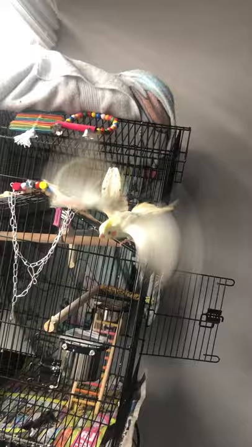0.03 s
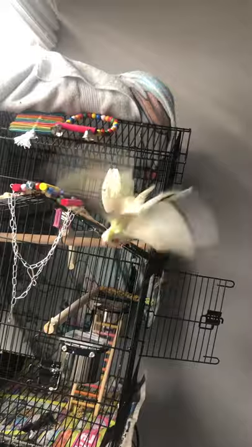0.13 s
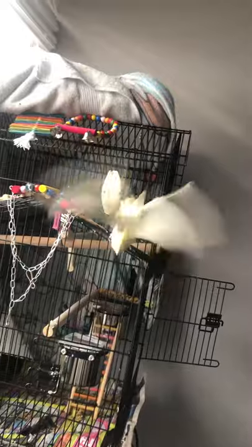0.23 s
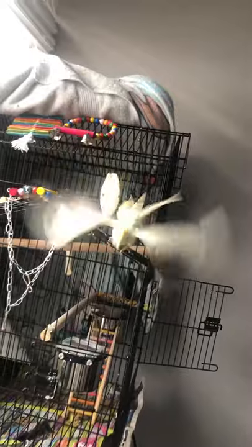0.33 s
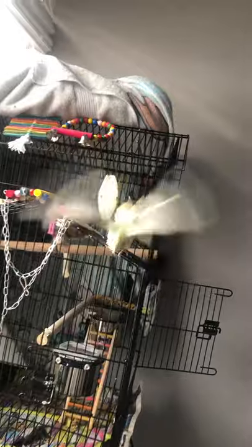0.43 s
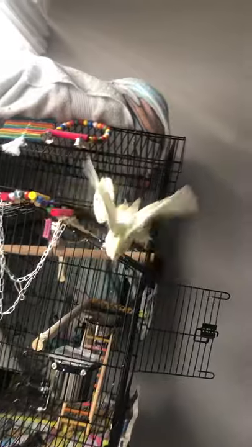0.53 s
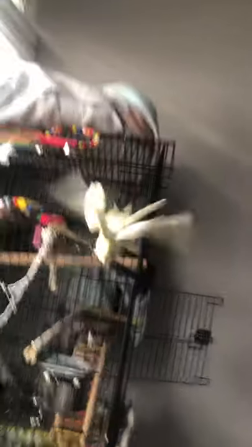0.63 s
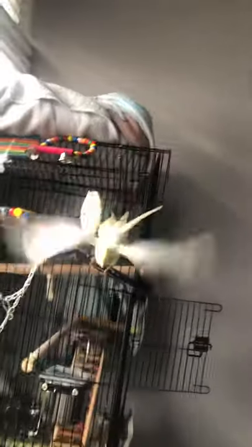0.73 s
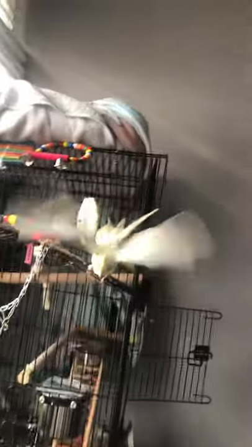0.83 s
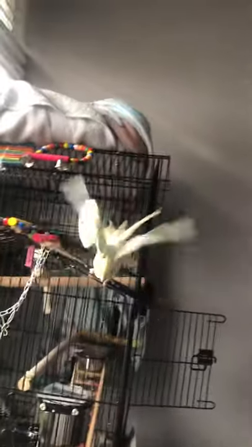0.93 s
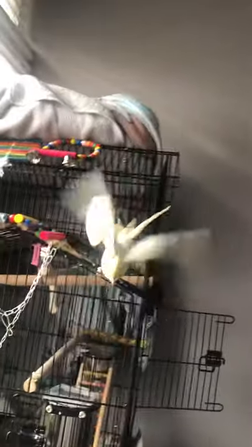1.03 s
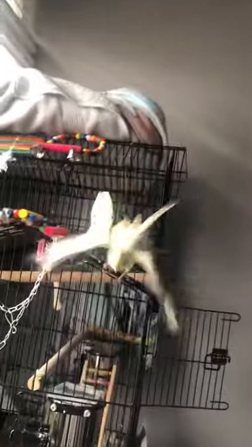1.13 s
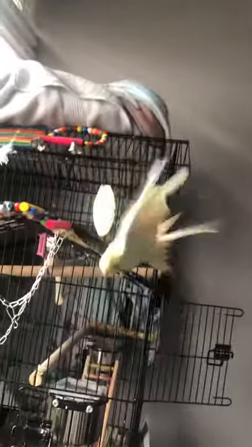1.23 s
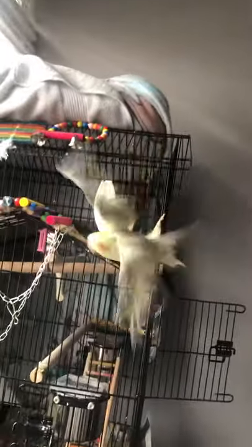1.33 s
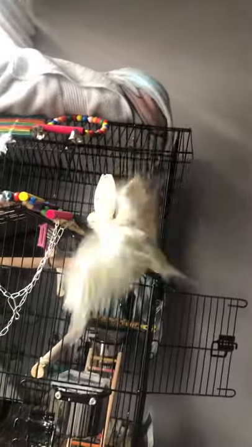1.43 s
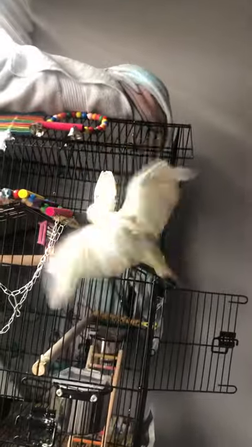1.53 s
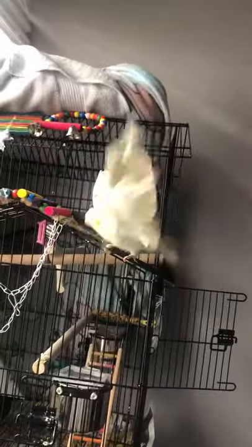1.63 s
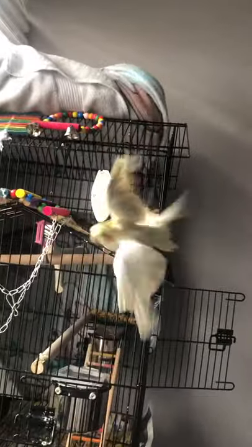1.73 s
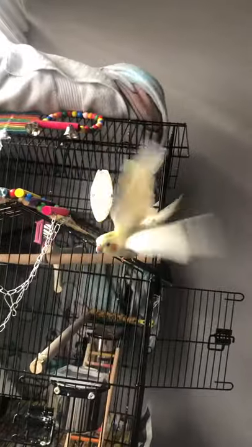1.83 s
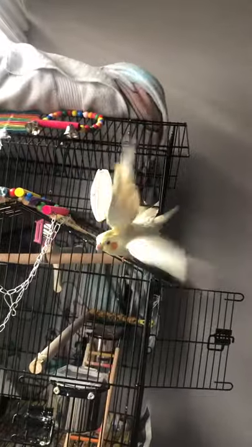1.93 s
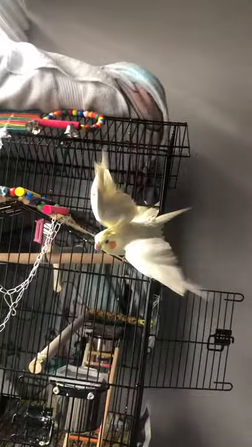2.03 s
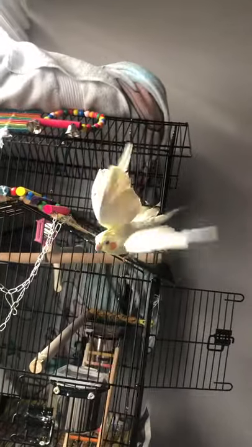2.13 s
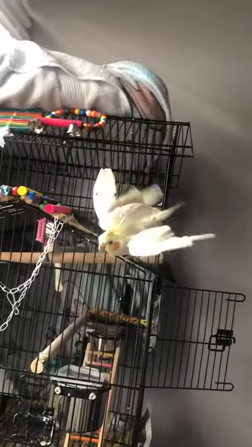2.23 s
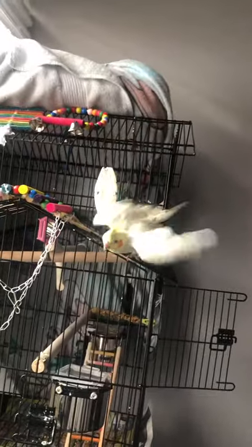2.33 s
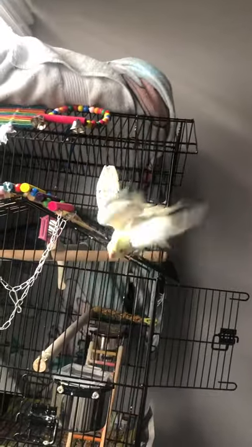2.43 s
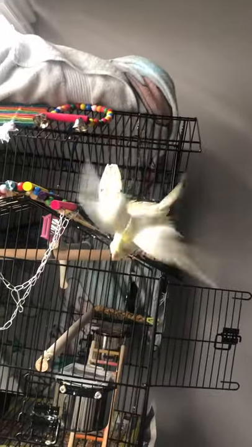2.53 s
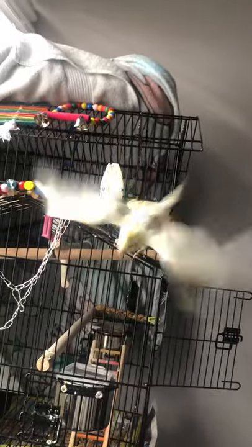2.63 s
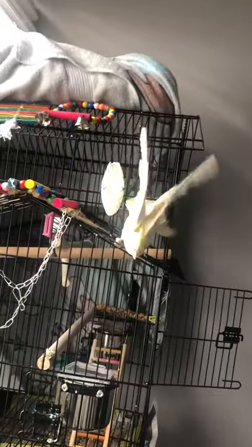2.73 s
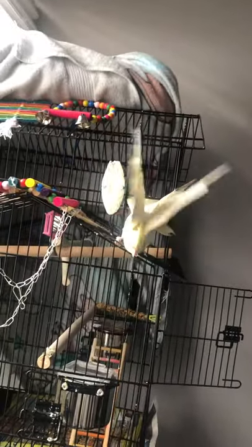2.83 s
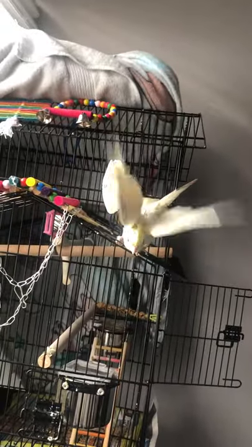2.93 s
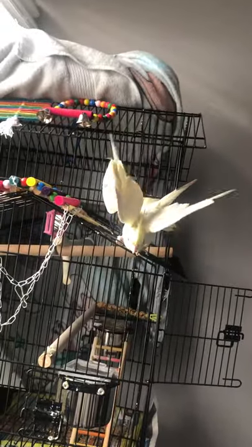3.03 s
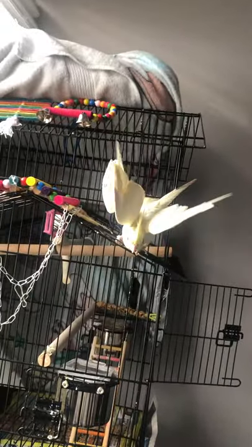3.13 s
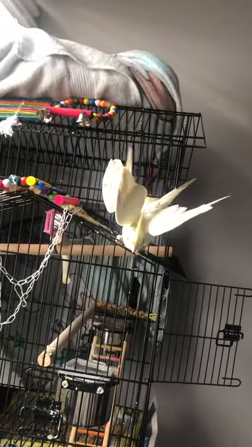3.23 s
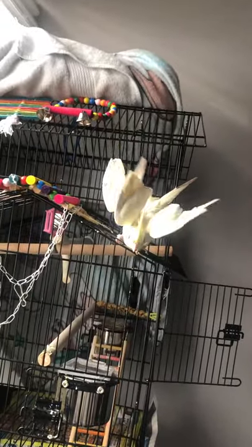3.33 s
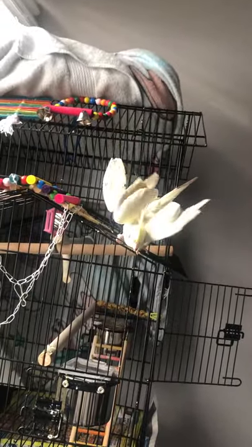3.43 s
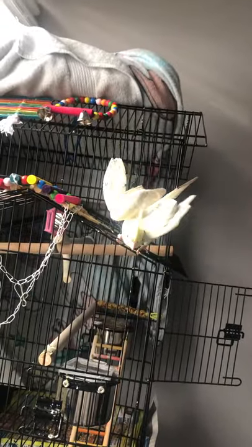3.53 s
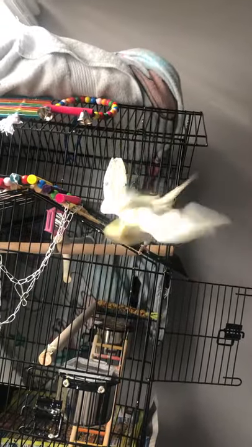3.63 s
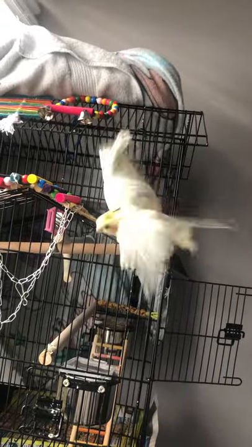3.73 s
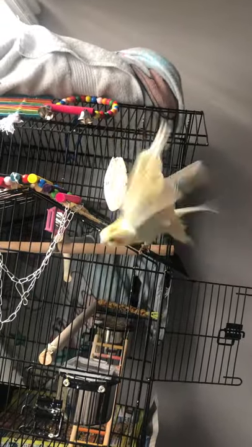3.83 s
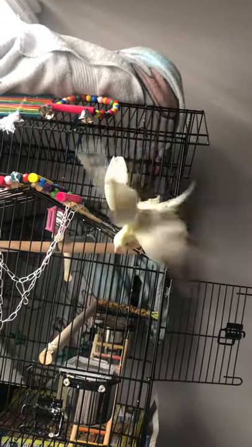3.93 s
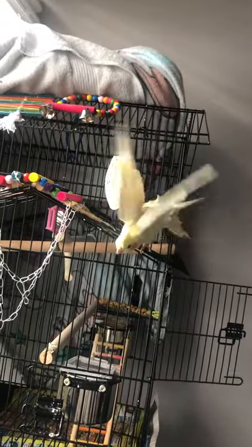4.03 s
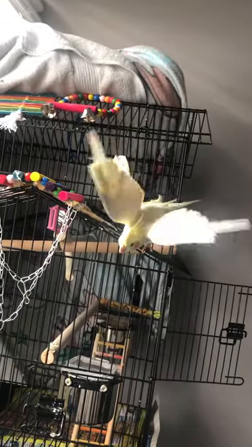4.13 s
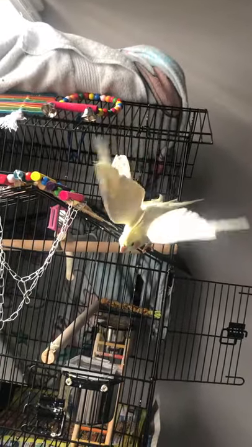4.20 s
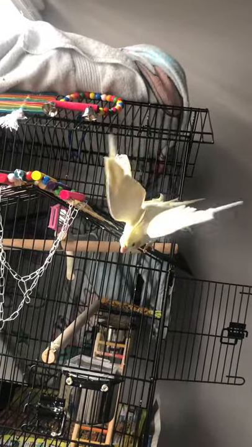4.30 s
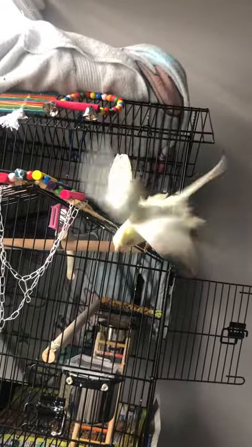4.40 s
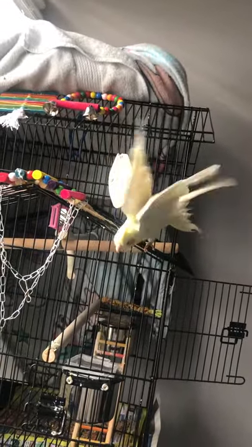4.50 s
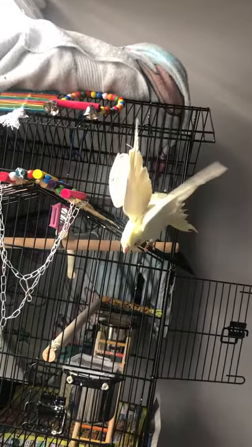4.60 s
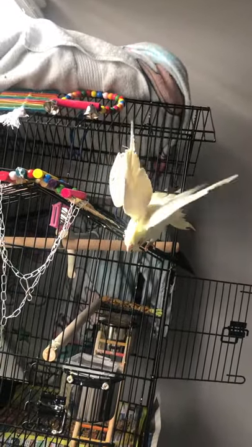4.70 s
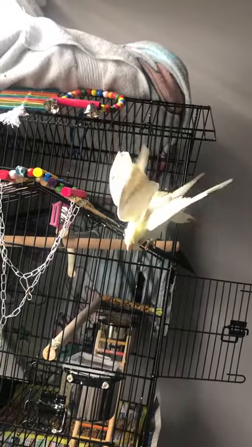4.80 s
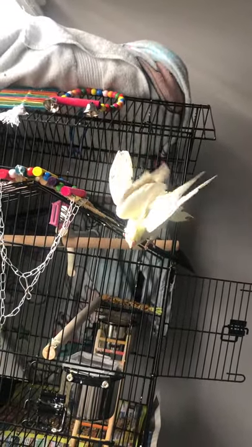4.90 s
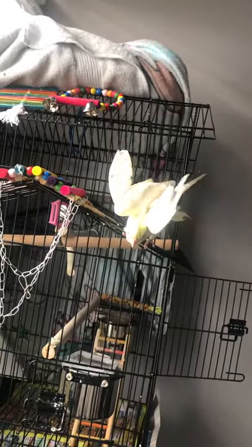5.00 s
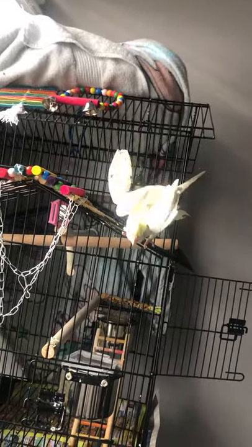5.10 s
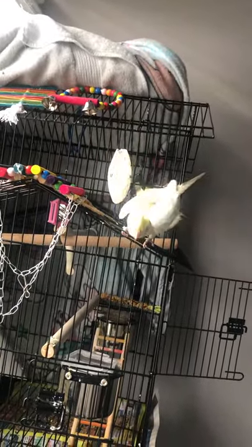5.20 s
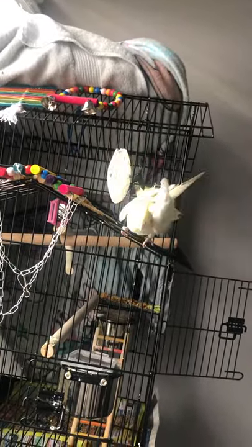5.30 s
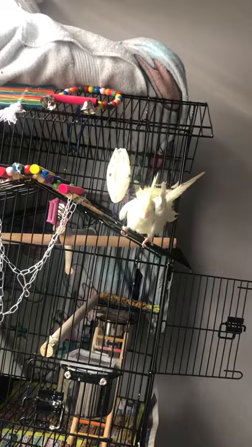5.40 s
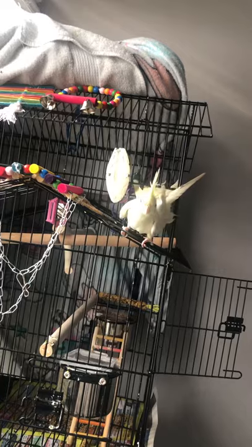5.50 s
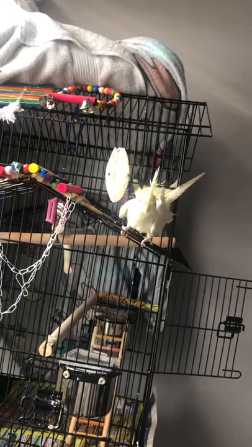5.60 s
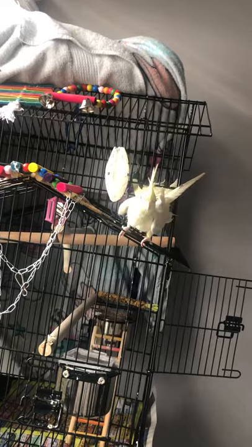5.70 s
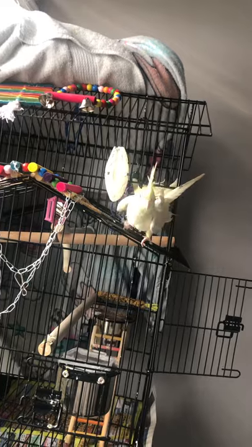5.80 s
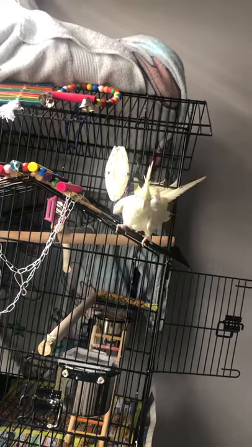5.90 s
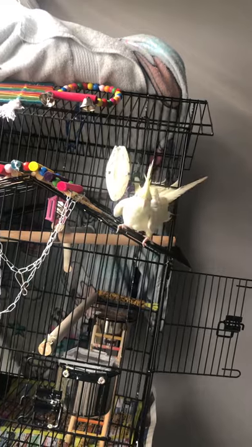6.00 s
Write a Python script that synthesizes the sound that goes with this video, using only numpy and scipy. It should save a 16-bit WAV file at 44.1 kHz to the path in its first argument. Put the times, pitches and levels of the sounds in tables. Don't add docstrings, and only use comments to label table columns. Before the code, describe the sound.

A small parrot beats its wings against its wire cage, feathers snapping sharply on the bars while a loose door clatters and rings in a quiet room.

```python
import sys
import numpy as np
from scipy import signal
from scipy.fft import rfft, irfft
from scipy.io import wavfile
from scipy.ndimage import uniform_filter1d, map_coordinates

SR = 44100
rng = np.random.default_rng(int(sys.argv[2]) if len(sys.argv) > 2 else 0)


def master(y):
    cut = np.clip(np.atleast_2d(y).T, -1, 1)
    pcm = np.round(cut * 32767)
    wavfile.write(sys.argv[1], SR, pcm.astype(np.int16))


def volts(x):
    e = np.asarray(x, float) / 20
    return 10 ** e


N = 266849
PATHS = 7
WALL_DELAY_S = 0.003


def unit(x):
    return x / np.sqrt(np.mean(x ** 2) + 1e-20)


def along(points, hz):
    point_hz, value = np.transpose(points)
    return np.interp(np.log(hz + 1), np.log(point_hz + 1), value)


def wobble(rate_hz):
    knots = rng.standard_normal(int(N * rate_hz / SR) + 4)
    return map_coordinates(knots, [np.arange(N) * rate_hz / SR])


def noise(spectrum):
    hz = np.fft.rfftfreq(N, 1 / SR)
    return unit(irfft(rfft(rng.standard_normal(N)) * volts(along(spectrum, hz)), N))


def band(x, hz, width):
    edges_hz = np.clip([hz * (1 - width / 2), hz * (1 + width / 2)], 50, .45 * SR)
    return signal.lfilter(*signal.butter(1, edges_hz, "bandpass", fs=SR), x)


def add(track, start_s, piece):
    part = track[round(start_s * SR):][:len(piece)]
    part += piece[:len(part)]


def feather(blow, level_db, pitch_hz, body_db):
    bright = band(blow, pitch_hz, width=0.12) + volts(-5.5) * band(blow, 7840, width=1.05)
    body = band(blow, 2330, width=1.56)
    return volts(level_db) * (bright + volts(body_db + 12.0) * body)


# start_s, first_peak_db, pitch_hz, body_db, tail_db
RAKES = [(0.171, -20.5, 7400, -25, -14.5), (0.1802, -24, 12100, -22, -17), (0.28, -29.5, 6030, -6.5, -11),
         (0.2965, -16.5, 7350, -15, -17), (0.5227, -37.5, 4900, -12, -19), (1.0617, -24, 9700, -5, -13),
         (1.0646, -17.5, 12500, -8.5, -11), (1.0668, -36, 1060, -32, -11),
         (1.3211, -33.5, 8600, -2.5, -12.5), (1.3241, -31, 6550, -12, -9), (1.44, -39, 5000, -4, -6),
         (1.5196, -15, 9100, -8, -18.5), (1.5387, -20, 6400, -19, -15), (2.338, -34.5, 3870, -7, -14.5),
         (2.5357, -20, 9150, -8, -15.5), (2.543, -18.5, 6700, -14.5, -11.5), (2.5674, -18, 6900, -14, -20),
         (3.6201, -22, 5600, -10.5, -14.5), (3.6612, -24, 7550, -6.5, -14), (3.806, -37, 4800, -0.5, -14.5),
         (4.2957, -13, 7850, -18, -9.5), (4.307, -12, 8050, -23.5, -11.5)]
# start_s, peak_db, pitch_hz, tail_db
FEATHER_TIPS = [(0.0407, -39, 5300, -17), (0.063, -30.5, 11600, -25), (0.0705, -35, 6850, -7.5),
                (0.1691, -32, 9800, -18), (0.2681, -34, 12000, -8), (0.2826, -27, 3470, -20),
                (0.4966, -48, 11500, -6), (0.53, -33, 4700, -17), (0.7575, -40, 4700, -6),
                (0.777, -27.5, 4500, -12), (1.063, -21, 12300, -9), (1.1787, -44, 3800, -15),
                (1.2613, -48, 4000, -12.5), (1.3289, -34.5, 3480, -3), (1.4916, -36, 6370, -12),
                (2.3446, -43, 5500, -1.5), (2.5215, -43.5, 6600, -17), (2.5415, -41, 9700, -17),
                (3.592, -45, 2720, 0), (3.63, -39, 2560, 1), (3.740, -45, 11000, -6),
                (3.7742, -44, 7000, -8), (3.787, -39.5, 9950, -8), (5.736, -56.5, 12600, 6),
                (5.867, -53, 6000, -10), (5.616, -57, 2500, -14)]
TIP_BODY_DB = -15.5
QUILLS, QUILL_GAP_S, QUILL_LOSS_DB = 3, .002, 8.5
QUILL_SCATTER = .15


def quills():
    chance = rng.standard_normal((len(RAKES), QUILLS, 2))
    contacts = []
    for (start_s, peak_db, pitch_hz, body_db, tail_db), row in zip(RAKES, chance):
        for k, (late, detune) in enumerate(row):
            quill_s = start_s + k * QUILL_GAP_S * (1 + .15 * late)
            quill_hz = pitch_hz * (1 + QUILL_SCATTER * detune * (k > 0))
            contacts.append((quill_s, peak_db - k * QUILL_LOSS_DB, quill_hz, body_db + 3 * k, tail_db + 2.3 * k))
    for start_s, peak_db, pitch_hz, tail_db in FEATHER_TIPS:
        contacts.append((start_s, peak_db, pitch_hz, TIP_BODY_DB, tail_db))
    return contacts


def snaps():
    near, far = np.zeros(N), np.zeros((PATHS, N))
    t = np.arange(SR // 20) / SR
    for k, (start_s, peak_db, pitch_hz, body_db, tail_db) in enumerate(quills()):
        white, later, sizes = rng.standard_normal((3, len(t)))
        crack = white * volts(-60 * t / 0.00052)
        crack /= abs(feather(crack, 0, pitch_hz, body_db - 10)).max()
        spikes = volts(14 * uniform_filter1d(sizes, size=9)) * (1 - np.exp(-t / 0.00021))
        tail = later * spikes * volts(-60 * t / 0.054)
        scatter = feather(tail, peak_db + tail_db - 5.5, pitch_hz, body_db)
        add(near, start_s - .0002, feather(crack, peak_db + 1, pitch_hz, body_db - 4) + scatter)
        add(far[k % PATHS], start_s + WALL_DELAY_S, scatter)
    return near + volts(-4.0) * room(far)


# start_s, peak_db, pitch_hz, body_db, length_s
BAR_BRUSHES = [(0.0623, -26.5, 12500, -13, 0.023), (0.1824, -21.5, 5660, -14.5, 0.014),
               (0.2683, -37, 5450, -12, 0.012), (0.398, -38, 4130, -11, 0.015),
               (0.5147, -32, 4800, -9.5, 0.016), (0.5168, -47, 4740, -9, 0.0099),
               (0.631, -44, 8520, -5, 0.044), (0.7577, -27, 4800, -18, 0.024),
               (1.205, -24, 4140, -26, 0.025), (1.264, -43, 8150, 0, 0.022),
               (1.4331, -37, 4100, -14, 0.025), (1.75, -54, 4200, 6, 0.018), (1.859, -54.5, 4470, 3, 0.014),
               (2.2645, -47.5, 6860, -3.5, 0.018), (2.397, -42, 7850, -27, 0.054),
               (3.298, -53, 9100, -13, 0.034), (3.5513, -40.5, 4260, -20, 0.14),
               (3.948, -53, 4260, -7, 0.022), (4.811, -54, 5680, -26, 0.035),
               (1.038, -41.5, 11000, -14, 0.033),
    (2.504, -43, 8400, -11, 0.042),
    (4.265, -48.5, 7000, -15, 0.096),
]


def brushes():
    near, far = np.zeros(N), np.zeros((PATHS, N))
    t = np.arange(SR // 5) / SR
    for k, (start_s, peak_db, pitch_hz, body_db, length_s) in enumerate(BAR_BRUSHES):
        white, sizes = rng.standard_normal((2, len(t)))
        swell = (1 - np.exp(-t / 0.0048)) * np.exp(-(t / np.clip(length_s, .004, .09)) ** 2)
        ticks = white * volts(3.6 * uniform_filter1d(sizes, size=9)) * swell
        brush = feather(ticks, peak_db - 15.5, pitch_hz, body_db + 0.5)
        add(near, start_s - .0015, brush)
        add(far[k % PATHS], start_s + WALL_DELAY_S, brush)
    return near + volts(-5.5) * room(far)


def rings(modes, t, spread, blur):
    hz, level_db, t60_s = np.transpose(modes)[:, :, None]
    size, shift, phase = rng.standard_normal((3, len(modes), 1))
    wander = blur * np.cumsum(rng.standard_normal((len(modes), len(t))), axis=1)
    decay = volts(level_db + 0.78 * size - 60 * t / t60_s)
    return decay * np.sin(2 * np.pi * (hz * (1 + spread * shift) * t + phase + wander))


def reach(modes, low_db, high_db):
    hz = np.array(modes)[:, :1]
    return volts(np.where(hz < 1000, low_db, np.where(hz > 2500, high_db, 0)))


# start_s, peak_db, low_modes_db, high_modes_db
DOOR_KNOCKS = [(0.0363, -44, -14, -11.5), (0.0897, -42, -17, -9), (0.1384, -43.5, -11.5, -4.5),
               (0.191, -45, -9.5, -6), (0.2404, -44, -9.5, -5), (0.3521, -44.5, -17, -1.5),
               (0.4084, -46, -13, -7), (0.4684, -45.5, -12, -2), (0.5914, -46, -14, -5),
               (0.7154, -46.5, -11.5, -5.5), (0.8385, -48, -8.5, -5), (1.1984, -45.5, -12, -6.5),
               (1.2945, -45.5, -9.5, -2.5), (1.3553, -45, -12, -5.5), (1.4097, -45, -10, -3),
               (1.4544, -44.5, -0.5, 2), (1.5744, -49.5, -4, -2), (1.6681, -48, -7, -3),
               (1.7294, -47.5, -15, -3.5), (1.7994, -58, -3, -7.5), (2.5681, -48, -5.5, 3.5),
               (2.6135, -48, -9.5, 0.5), (2.6768, -54.5, -5.5, -5.5), (2.7594, -66.5, 0, -14),
               (3.6995, -48, -5.5, -1), (3.8008, -50.5, -8, -0.5), (3.8651, -59, -15, -8),
               (4.3794, -48.5, -13, -7), (4.4344, -50, -12, -0.5), (4.4962, -57, -9, -18),
               (0.9892, -57, -9, -6),
    (2.9094, -68, 1.5, -18),
    (3.9135, -66, 2, -16),
    (4.6493, -70, -16, -12),
]
# pitch_hz, level_db, t60_s
WIRE_MODES = [(478, -1.5, 0.87), (676, -5.5, 1.07), (781, 0, 1.67), (1665, -6.5, 1.5), (1879, 5, 0.35),
              (1925, -17, 0.18)]
# pitch_hz, level_db, t60_s
DOOR_MODES = [(682, -5.5, 0.12), (730, -7.5, 0.074), (1342, -7.5, 0.11), (1907, -3.5, 0.12),
              (2060, -2, 0.048), (2053, -13, 0.073), (3066, -6, 0.049), (3223, -6, 0.054),
              (3222, -3.5, 0.041), (4140, -3, 0.064), (4200, -10.5, 0.049), (4624, -7, 0.049),
              (5470, -8, 0.029), (6260, -8, 0.05)]


def cage():
    near, far = np.zeros(N), np.zeros((PATHS, N))
    t = np.arange(SR * 2 // 3) / SR
    door_t = t[:SR // 8]
    wire_swell = (1 - np.exp(-t / 0.0055)) * np.cos(np.pi / 2 * t / t[-1])
    for k, (start_s, peak_db, low_db, high_db) in enumerate(DOOR_KNOCKS):
        chatter = rng.standard_normal(2000) ** 3 * volts(-25.5 - 60 * t[:2000] / .05)
        chatter[0] = 4
        panel = reach(DOOR_MODES, low_db / 2 + 5.5, high_db + 6.0) * rings(DOOR_MODES, door_t, .006, .016)
        panel = panel.sum(0) * (1 - np.exp(-door_t / 0.00093))
        door = signal.fftconvolve(panel, chatter / np.linalg.norm(chatter))
        wires = reach(WIRE_MODES, low_db + 6.0, high_db + 4.0) * rings(WIRE_MODES, t, .0006, .004)
        add(near, start_s - .001, volts(peak_db - 3.0) * door)
        add(far[k % PATHS], start_s + WALL_DELAY_S, volts(peak_db - 7) * door)
        add(near, start_s, volts(peak_db - 15.5) * wires.sum(0) * wire_swell)
    return near + room(far)


# pitch_hz, width_hz, level_db
BAR_MODES = [(680, 250, 4.5), (1680, 730, 0), (3670, 450, 3), (4170, 500, 1), (6700, 650, -3),
             (8250, 380, -7), (9700, 130, -24), (11100, 160, 0), (13500, 250, -9)]
SLIDE_S, SLIDE_HOLD_S, SLIDE_DB = 5.692, 0.078, -61.5
GRIP_DB_PER_S, PRESS_DB_PER_S, SLIP_DB_PER_S = 1100, 35, 152


def claw():
    f = np.fft.rfftfreq(N, 1 / SR)
    bar = volts(-24)
    for pitch_hz, width_hz, level_db in BAR_MODES:
        mode = 1j * f / (pitch_hz * pitch_hz - f * f + 1j * f * width_hz) * width_hz
        bar = bar + volts(level_db) * mode
    grains = rng.standard_normal(N) * volts(2.5 * wobble(400) + 1.2 * wobble(60))
    t = np.arange(N) / SR - SLIDE_S
    press_db = PRESS_DB_PER_S * np.minimum(t - SLIDE_HOLD_S, 0)
    edge_db = np.minimum(GRIP_DB_PER_S * t, SLIP_DB_PER_S * (SLIDE_HOLD_S - t))
    slide_db = SLIDE_DB + press_db + np.minimum(0, edge_db)
    return volts(slide_db) * unit(irfft(rfft(grains) * bar, N))


# freq_hz, density_db
SWISH_SPECTRUM = [(290, -46), (500, 0.5), (1180, -18), (1740, -7.5), (1930, -11.5), (2160, -8), (7860, -10),
                  (9490, -12), (16000, -13)]
# freq_hz, density_db
PUSH_SPECTRUM = [(30, -5), (65, -5.5), (130, 2), (220, -6), (450, -10), (900, -42)]
# time_s, effort_db
WING_EFFORT = [(0.03, -59), (0.35, -58.5), (0.7, -65.5), (1.0, -66.5), (1.2, -61.5), (1.5, -55.5),
               (1.85, -69), (1.95, -77), (2.3, -73.5), (2.65, -66), (2.85, -81.5), (3.5, -81), (3.58, -61),
               (3.9, -71.5), (4.15, -80), (4.6, -86), (4.8, -74.5), (5.3, -86)]
# peak_s, swish_db, push_db, length_s
WING_STROKES = [(0.08, -62, -59, 0.031), (0.19, -68, -57, 0.043), (0.296, -46, -51, .025),
                (0.535, -77, -58, 0.07), (0.78, -76, -57.5, 0.018), (1.075, -55, -47, 0.025),
                (1.23, -53, -76, 0.066), (1.276, -50, -56, 0.038), (1.356, -72, -48.5, 0.039),
                (1.52, -71, -41.5, 0.026), (2.155, -68, -60, 0.026), (2.323, -63.5, -65, 0.058),
                (2.548, -72, -48, 0.023), (2.627, -68, -81, 0.023), (3.633, -42, -45.5, 0.022),
                (3.67, -64, -48.5, 0.016), (3.804, -57, -52, 0.039), (4.32, -86, -58, 0.1),
                (4.687, -68, -70, .03), (4.868, -75, -72, 0.14), (5.82, -81, -57.5, 0.062)]
STIR_DB = -10
RECOVERY = 2.2


def wings():
    now = np.arange(N) / SR
    swish = unit(noise(SWISH_SPECTRUM) * volts(1.73 * wobble(60) + 1.1 * wobble(900)))
    push = unit(noise(PUSH_SPECTRUM) * volts(1.46 * wobble(25.12)))
    rub = volts(np.interp(now, *np.transpose(WING_EFFORT)) + 0.5 * wobble(13))
    air = volts(STIR_DB) * rub
    for peak_s, swish_db, push_db, length_s in WING_STROKES:
        fade_s = np.where(now < peak_s, length_s / 2, length_s / 2 * RECOVERY)
        swell = np.exp(-abs(now - peak_s) / fade_s)
        rub = rub + volts(swish_db - 5.0) * swell
        air = air + volts(push_db - 4.5) * swell
    return swish * rub + push * air


# freq_hz, t60_s
WALL_DECAY = [(200, 0.58), (800, 0.48), (2000, 0.47), (6000, 0.32), (15000, 0.19)]


def room(paths):
    hz, t, z = signal.stft(rng.standard_normal((PATHS, SR // 2)), SR, nperseg=256)
    decay = volts(-60 * t / along(WALL_DECAY, hz)[:, None])
    tail = signal.istft(z * decay, SR, nperseg=256)[1]
    tail *= 1 - np.exp(-np.arange(tail.shape[1]) / SR / 0.0077)
    tail /= np.linalg.norm(tail, axis=1, keepdims=True)
    return signal.fftconvolve(paths, tail, axes=1).sum(0)[:N]


# freq_hz, density_db
QUIET_SPECTRUM = [(15, -49), (25, -8.5), (55, -7.5), (172, -6), (202, -0.5), (232, -12), (304, -4.5),
                  (399, -13), (483, -14), (1430, -24), (1680, -26), (2900, -28), (12600, -30.5),
                  (15200, -36.5), (16500, -46)]
# pitch_hz, rms_db
HUM_TONES = [(60, -76.5), (200, -97)]
QUIET_DB = -66


def room_tone():
    now = np.arange(N) / SR
    hum = np.zeros(N)
    for pitch_hz, rms_db in HUM_TONES:
        hum += volts(rms_db + 3 + 2.7 * wobble(8.5)) * np.sin(2 * np.pi * pitch_hz * now)
    return volts(QUIET_DB - 1.23 + 0.46 * wobble(2.8)) * noise(QUIET_SPECTRUM) + hum


def scene():
    return (snaps() + brushes() + cage() + claw() + wings() + room_tone())[None]


def low_pass(x):
    return signal.sosfilt(signal.butter(12, 16990, fs=SR, output="sos"), x)


# freq_hz, gain_db
MIC_RESPONSE = [(15, -33), (30, -9), (38, -0.5), (15400, 0), (15900, -20), (16900, -27)]
START_S = .0362


def record(dry):
    response = volts(along(MIC_RESPONSE, np.fft.rfftfreq(N, 1 / SR)))
    heard = irfft(rfft(dry) * response, N)
    return low_pass(heard * (np.arange(N) / SR > START_S))


dry = scene()
out = record(dry)
master(out)
```